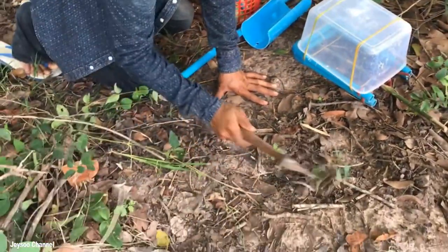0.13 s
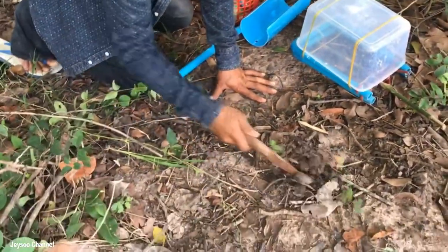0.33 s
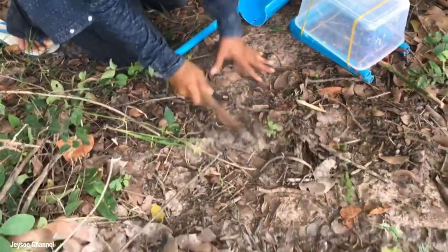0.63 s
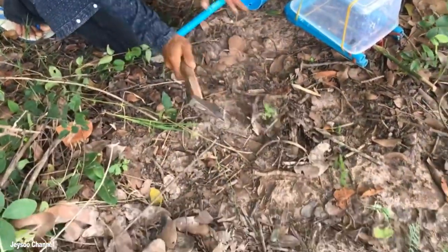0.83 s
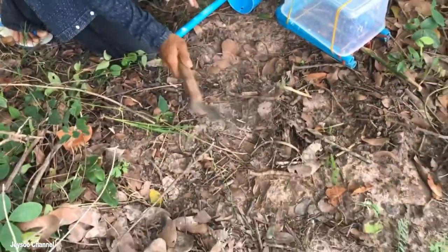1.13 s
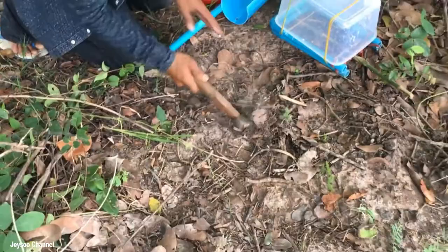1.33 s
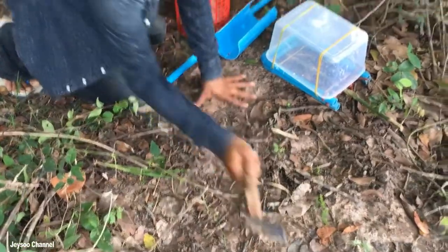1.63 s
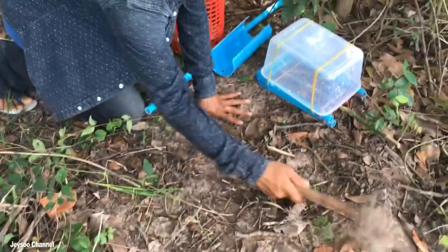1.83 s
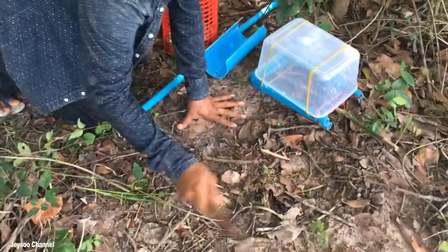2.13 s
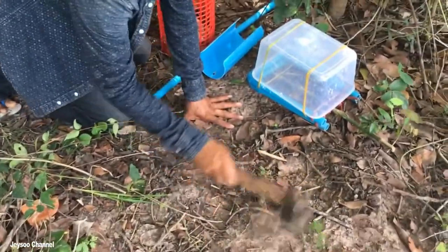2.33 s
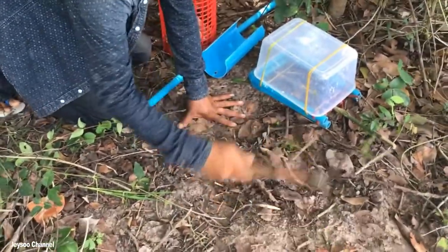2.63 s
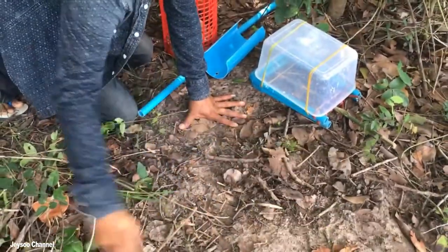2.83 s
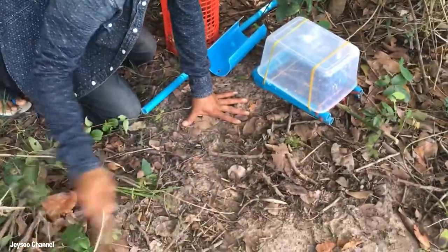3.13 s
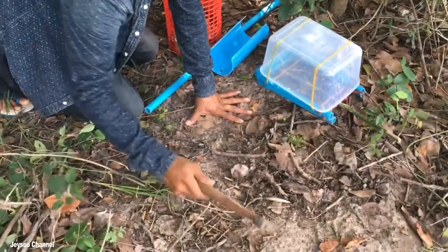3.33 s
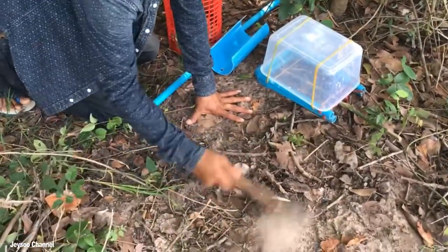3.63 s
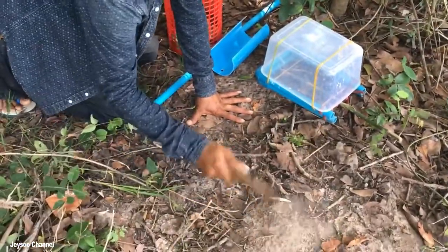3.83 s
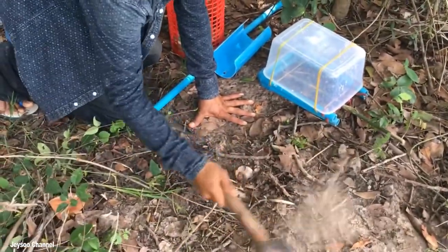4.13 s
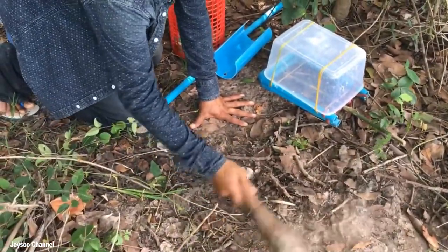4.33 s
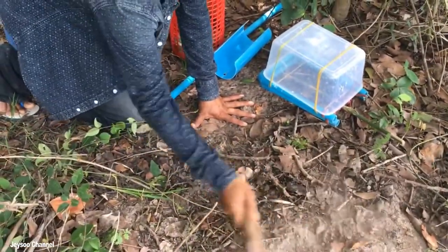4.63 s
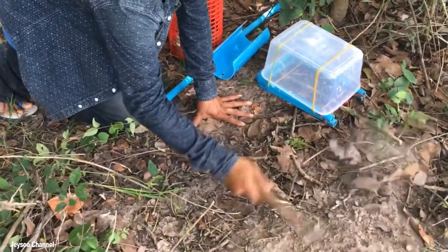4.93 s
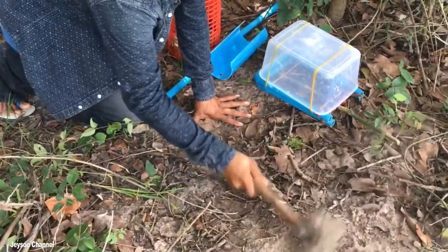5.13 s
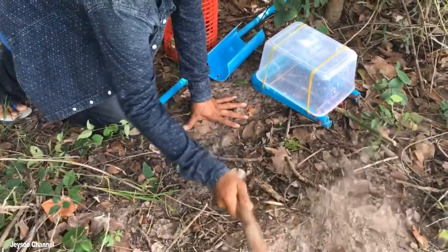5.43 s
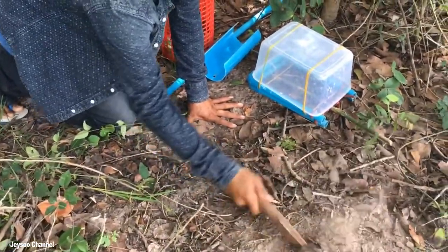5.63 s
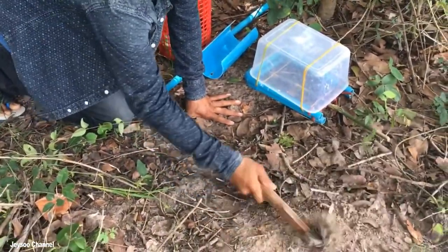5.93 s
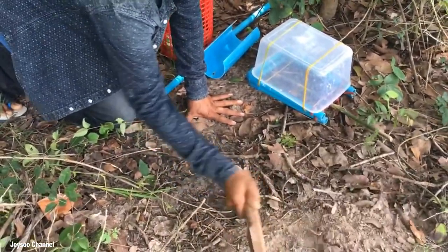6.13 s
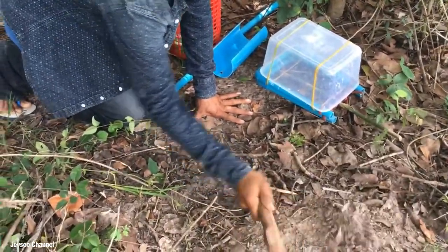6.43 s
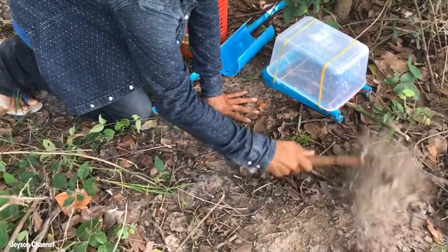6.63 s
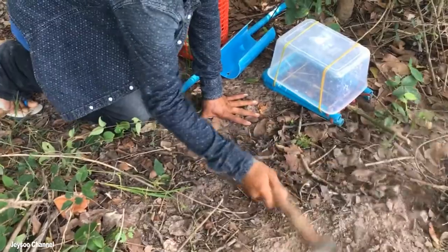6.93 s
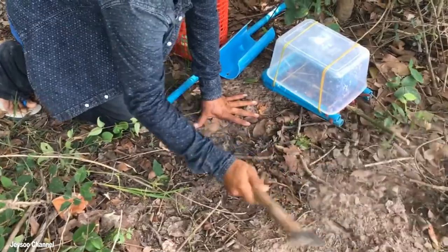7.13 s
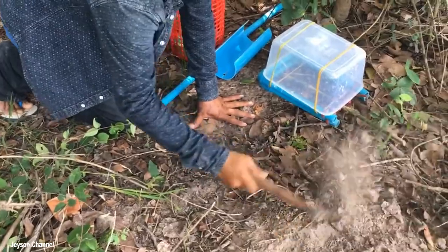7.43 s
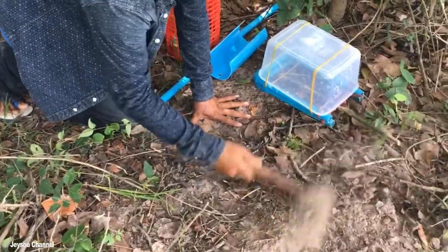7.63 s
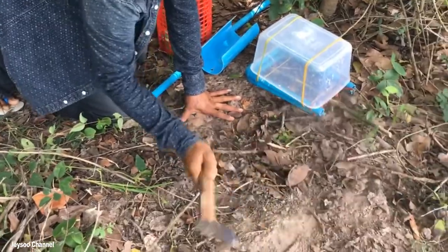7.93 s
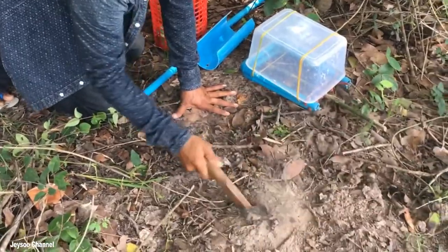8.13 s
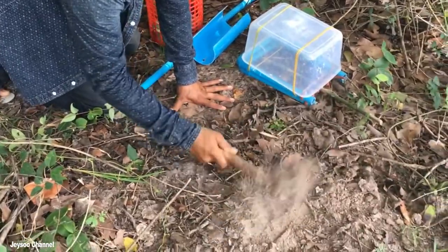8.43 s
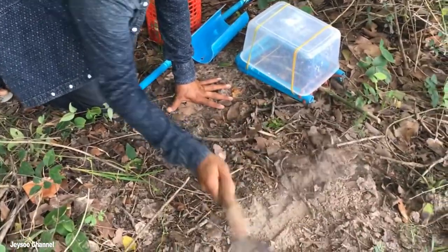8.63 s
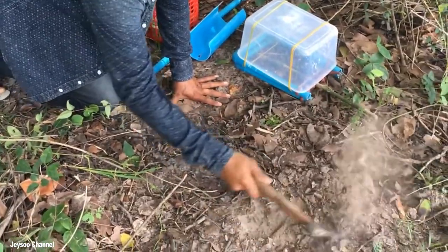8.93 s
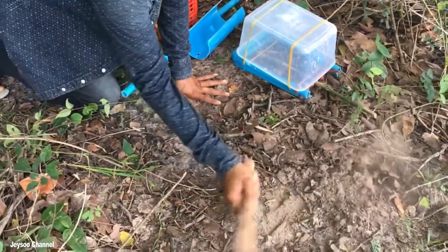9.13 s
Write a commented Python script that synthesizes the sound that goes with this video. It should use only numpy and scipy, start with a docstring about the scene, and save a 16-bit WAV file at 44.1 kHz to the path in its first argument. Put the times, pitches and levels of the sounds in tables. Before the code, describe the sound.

Short gritty hoe bites in dry earth, about three a second, with crunching leaf litter, pattering crumbs and dull ground thuds, heard very close.

```python
"""A small steel hoe with a wooden handle chops and rakes dry soil under leaf litter, outdoors, close to one microphone.
Each bite breaks crumbs, grates sand and rings the blade; the ground answers with thuds of damped noise.
Stirred leaves crackle as ringing fragments, snaps and dust hiss, with earth pattering down among them.
Clods knock as short hollow modes and tumble on; one squeak is faint.
Behind lie a low outdoor rumble and a faint far hiss, both of shaped noise."""
import sys
import numpy as np
from scipy import signal
from scipy.fft import rfft, irfft
from scipy.io import wavfile

SR = 44100
rng = np.random.default_rng(int(sys.argv[2]) if len(sys.argv) > 2 else 0)


def inscribe(sig):
    """Save sig as 16-bit PCM at rate SR to the path in sys.argv[1].

    A 1-D sig is mono; a 2-D sig holds one channel per row.
    Samples are clipped to [-1, 1] before scaling.
    """
    pcm = np.round(np.clip(np.atleast_2d(sig).T, -1, 1) * 32767)
    wavfile.write(sys.argv[1], SR, pcm.astype(np.int16))


N = 409248
TIME = np.arange(N) / SR  # seconds
CUTOFF_HZ = 15600  # top of the treble


def from_db(db):
    """Decibels to gain."""
    return 10 ** (np.asarray(db) / 20)


def rms_one(x):
    """Scale to unit power."""
    return x / np.sqrt(np.mean(x ** 2) + 1e-20)


def peak_one(x):
    """Scale to unit height."""
    return x / np.abs(x).max()


def curve(rows):
    """Join (seconds, value) rows by straight lines."""
    return np.interp(TIME, *np.transpose(rows))


def add(track, s, sound):
    """Mix a short sound into a track at time s in seconds."""
    start = max(0, int(s * SR))
    track[start:start + len(sound)] += sound[:max(0, N - start)]


def colour(x, spectrum, size=4096):
    """Causal (minimum-phase) filter with the given spectrum; white input keeps its power."""
    hz, db = np.transpose(spectrum)
    bins_hz = np.fft.rfftfreq(size, 1 / SR)
    log_gain = np.log(from_db(np.interp(np.log(bins_hz + 1), np.log(hz), db)))
    # keeping only the positive half of the cepstrum, doubled by the square, makes it causal
    cepstrum = irfft(log_gain)[:size // 2]
    response = irfft(np.exp(2 * rfft(cepstrum, size)))
    return signal.oaconvolve(x, response / np.linalg.norm(response))[:N]


def ring(x, hz, t60):
    """One mode: a unit click sets a sine of height 1 ringing, down 60 dB after t60 seconds."""
    radius = from_db(-60 / (t60 * SR))
    angle = 2 * np.pi * min(hz, SR / 2) / SR
    feedback = [1, -2 * radius * np.cos(angle), radius * radius]
    return signal.lfilter([0, np.sin(angle)], feedback, x + 1e-18)


def wander(per_s, size=16384):
    """A random zigzag with a spread of about 1 and per_s corners a second."""
    corners = np.clip(rng.standard_normal(size), -2, 2)
    return np.interp(TIME * per_s, np.arange(size), corners)


def flutter(per_s, depth_db):
    """A gain that wanders at random, with unit power."""
    return rms_one(from_db(depth_db * wander(per_s)))


def detune(x, per_s, share):
    """Shift the pitch by a new random share, per_s times a second."""
    return np.interp(TIME + share / per_s * wander(per_s), TIME, x)


def grains(per_s, spread_db):
    """Random fractures of uneven size; about unit power at any rate."""
    sizes = rms_one(from_db(spread_db * np.minimum(rng.exponential(1, N), 4)))
    chance = np.minimum(per_s / SR, 1)
    struck = rng.random(N) < chance
    return sizes * rng.choice([-1, 1], N) * struck / np.sqrt(chance)


def burst(s, length_s, db, rise_db_per_s, fall_db_per_s):
    """Power of a movement that swells up to time s, holds and dies away."""
    before_s = np.maximum(s - TIME, 0)
    after_s = np.maximum(TIME - s - length_s, 0)
    below_db = before_s * rise_db_per_s + after_s * fall_db_per_s
    power, near = np.zeros(N), below_db < 60
    power[near] = from_db(db - below_db[near]) ** 2
    return power


# The blade bites into the soil. Each row: start in seconds, length in seconds, then relative levels in dB
# of crumbling earth, grit, blade ring and thud of the ground.
HOE_BITES = [(0.134, 0.014, -34.5, -28.5, -56, -69), (0.412, 0.012, -39.5, -36.5, -56, -65),
             (0.769, 0.014, -36, -38.5, -62, -43), (1.071, 0.011, -51, -34.5, -43, -40.5),
             (1.396, 0.0022, -34, -38, -52, -61), (1.917, 0.01, -33, -33, -38.5, -54),
             (2.11, 0.0034, -41.5, -36, -54, -48), (2.449, 0.003, -41, -38, -35.5, -59),
             (2.487, 0.035, -40.5, -30, -42.5, -58), (2.55, 0.012, -42, -38, -40, -41),
             (2.834, 0.028, -46.5, -40.5, -42.5, -37), (3.106, 0.021, -34.5, -29.5, -57, -48),
             (3.725, 0.026, -38, -35.5, -45.5, -60), (3.763, 0.0054, -52, -47, -44, -73),
             (4.138, 0.017, -31.5, -36.5, -40, -36.5), (4.44, 0.03, -40.5, -39, -46, -62),
             (4.49, 0.016, -39.5, -38.5, -41, -69), (4.509, 0.053, -51, -44.5, -51, -66),
             (4.799, 0.0057, -42, -33.5, -45, -74), (4.904, 0.0098, -41.5, -29, -43, -55),
             (5.23, 0.007, -44, -34, -48, -49), (5.252, 0.019, -41, -56, -43.5, -55),
             (5.309, 0.01, -46, -42, -43, -67), (5.612, 0.011, -35, -33.5, -41.5, -38.5),
             (5.963, 0.023, -39.5, -43, -51, -32), (6.273, 0.018, -38.5, -37, -47, -34),
             (6.588, 0.0313, -34, -37, -41, -37.5), (7.032, 0.007, -34, -37, -43, -52),
             (7.342, 0.014, -33.5, -39.5, -40, -53), (7.372, 0.011, -38.5, -37.5, -55, -61),
             (7.685, 0.036, -38, -42, -43.5, -54), (8.123, 0.011, -34, -36, -41, -47),
             (8.446, 0.013, -35, -38.5, -41, -49), (8.476, 0.024, -39, -41.5, -51, -40.5),
             (8.857, 0.014, -35.5, -32.5, -41.5, -48), (8.87, 0.039, -41, -34.5, -40, -40),
             (9.242, 0.041, -42, -37.5, -53, -61)]


def contact(part, rise_s, fall_s, ease_db):
    """Force of all bites: it jumps as the blade enters, eases as the soil slows it, and dies as the soil settles."""
    power = np.zeros(N)
    t = np.arange(SR // 4) / SR - 1 / 20  # seconds from the start of the bite
    column = ["s", "length", "earth", "grit", "ring"].index(part)
    for row in HOE_BITES:
        start, length = row[:2]
        outside = np.maximum(-t, 0) / rise_s + np.maximum(t - length, 0) / fall_s
        progress = np.clip(t / length, 0, 1)
        force = from_db(row[column] + ease_db * (.5 - progress)) * np.exp(-outside)
        add(power, start + t[0], force ** 2)
    return np.sqrt(power)


# Steel blade on its handle. Each row: mode in Hz (before detuning), relative level in dB, t60 in seconds.
BLADE_MODES = [(800, -9.5, 0.012), (1630, -3, 0.042), (2200, -22, 0.036), (5950, 3, 0.011),
               (5970, -1.5, 0.08), (13300, -14, 0.015)]
# Spectrum of crumbling earth. Each row: frequency in Hz, relative level in dB per Hz.
EARTH_SPECTRUM = [(120, -24), (300, -5.5), (520, -6.5), (800, 2.5), (1100, -1.5), (1550, 2), (2200, -1),
                  (3000, -14), (6000, -56)]
# Spectrum of grating sand. Each row: frequency in Hz, relative level in dB per Hz.
GRIT_SPECTRUM = [(900, -13), (2000, -1.5), (3000, 2.5), (4200, 2.5), (5000, -1), (6400, 1.5), (8000, -1),
                 (9700, -1), (10600, -6.5), (12000, -3.5), (15500, -7.5)]


def hoe(earth_db, grit_db, blade_db):
    """The blade sticks and slips: crumbs break, sand grates and the steel rings, detuned by the earth on it."""
    slips = flutter(per_s=670, depth_db=3)
    crumb_force = contact("earth", rise_s=0.00065, fall_s=0.0039, ease_db=5.5)
    crumbs = grains(per_s=4500, spread_db=2.5) * slips * crumb_force
    sand_force = contact("grit", rise_s=0.0025, fall_s=0.0059, ease_db=4.0)
    sand = grains(per_s=12000, spread_db=1.5) * slips * sand_force
    scratch_force = contact("ring", rise_s=0.00079, fall_s=0.01, ease_db=8.0)
    scratch = grains(per_s=10000, spread_db=-0.5) * scratch_force
    steel = np.zeros(N)
    for hz, db, t60 in BLADE_MODES:
        # each mode is scaled by the energy of its own ring
        energy_scale = np.sqrt(4 * np.log(1000) / (t60 * SR))
        steel += from_db(db) * ring(scratch, hz, t60) * energy_scale
    steel = detune(steel, per_s=8, share=0.0042)
    soil = from_db(earth_db) * colour(crumbs, EARTH_SPECTRUM) + from_db(grit_db) * colour(sand, GRIT_SPECTRUM)
    return soil + from_db(blade_db) * steel


# Spectrum of the struck ground. Each row: frequency in Hz, relative level in dB per Hz.
GROUND_SPECTRUM = [(40, -12), (110, -2.5), (200, 2.5), (350, 3), (560, -12.5), (1200, -14), (4000, -72)]
THUD_AT_SHARE = .55  # how far into a bite the ground takes the blow


def thuds(level_db, fall_s, size=4096):
    """Packed ground takes the blow with a dull, quickly damped shudder."""
    force, t = np.zeros(N), np.arange(size) / SR
    for s, length, *_, db in HOE_BITES:
        add(force, s + THUD_AT_SHARE * length, from_db(db + level_db) * np.exp(-t / fall_s))
    return colour(force * rng.standard_normal(N), GROUND_SPECTRUM)


# The hoe is dragged through the leaves, gathering speed.
# Each row: fastest moment in seconds, swell in dB per second, stirring level in dB.
LEAF_SWEEPS = [(0.409, 119, -45.5), (1.07, 117, -58), (1.793, 70, -50), (2.135, 500, -37),
               (2.512, 127, -30), (2.906, 205, -31.5), (3, 257, -28), (3.042, 193, -31),
               (3.085, 202, -28.5), (3.12, 146, -28), (4.44, 83, -53.5), (4.54, 224, -42.5),
               (4.843, 255, -31), (6.688, 276, -30.5), (7.78, 119, -34)]
# Thrown and pushed earth patters over the leaves. Each row: start in seconds, length in seconds, stirring level in dB.
EARTH_SHOWERS = [(0.205, 0.027, -48), (0.498, 0.0093, -48), (0.703, 0.078, -53), (1.0, 0.042, -53),
                 (1.646, 0.065, -55), (2.18, 0.087, -46), (2.572, 0.08, -42.5), (3.164, 0.16, -41),
                 (3.393, 0.039, -56), (3.956, 0.25, -57.5), (4.667, 0.079, -50.5), (4.93, 0.048, -41),
                 (5.066, 0.21, -46.5), (5.479, 0.073, -46), (5.991, 0.048, -52.5), (6.766, 0.052, -40),
                 (6.9, 0.06, -38), (7.32, 0.29, -49.5), (7.891, 0.2, -44.5), (8.513, 0.11, -49.5),
                 (8.72, 0.11, -49), (9.12, 0.3, -50.5)]
# Leaves settle between strokes. Each row: time in seconds, stirring level in dB.
LEAF_SETTLING = [(0, -61), (.8, -57.5), (1.5, -58.5), (1.88, -62), (2.05, -54), (3.68, -64), (4.3, -62.5),
                 (5.85, -60.5), (6.5, -61.5), (7.2, -54.5), (8.38, -70), (9, -52)]
SHAKE_DB = -15  # leaves shaken by each bite, relative to its grit
SHAKE_RISE_DB_PER_S, SHAKE_FALL_DB_PER_S = 1500, 167
SWEEP_FALL_DB_PER_S = 212
SHOWER_RISE_DB_PER_S, SHOWER_FALL_DB_PER_S = 224, 97.5


def stirring():
    """Level of the leaves in dB: bites shake them, sweeps drag them, earth rains on them, and they settle."""
    shaken = sum(burst(s + length, 0, grit + SHAKE_DB, SHAKE_RISE_DB_PER_S, SHAKE_FALL_DB_PER_S)
                 for s, length, _, grit, _, _ in HOE_BITES)
    dragged = sum(burst(s, 0, db, swell, SWEEP_FALL_DB_PER_S) for s, swell, db in LEAF_SWEEPS)
    showered = sum(burst(s, length, db, SHOWER_RISE_DB_PER_S, SHOWER_FALL_DB_PER_S)
                   for s, length, db in EARTH_SHOWERS)
    settling = from_db(curve(LEAF_SETTLING)) ** 2
    return 10 * np.log10(shaken + dragged + showered + settling)


# Spectrum of dry leaves. Each row: frequency in Hz, relative level in dB per Hz.
LEAF_SPECTRUM = [(200, -10.5), (650, -7.5), (1000, -5), (1800, -1.5), (3000, -1), (4300, 1.5), (5000, -1.5),
                 (6100, 3), (7400, -0.5), (9600, 0), (10500, -7), (11700, -2.5), (15500, -9.5)]
# Loose earth moving with the leaves. Each row: time in seconds, relative level in dB following the leaves.
LOOSE_EARTH_LEVEL = [(0, -0.5), (.5, -2.5), (1.8, -5.5), (2.1, -6), (3.1, -13), (4.4, -22), (6.9, -11),
                     (7.6, -20.5), (8.5, -4.5), (9.28, -30)]
EVEN_RUSH_DB = -31  # around this stirring level and above, the leaves merge into an even rush


def litter(stir_db, leaves_db, crackle_db, dust_db, earth_db, cycles, count=18):
    """Harder stirring breaks more leaf fragments a second; each rings at its own pitch over a hiss of dust."""
    per_s = 65 * from_db(.65 * (stir_db + 49.5))
    uneven = 1 / (1 + from_db(stir_db - EVEN_RUSH_DB))
    fragments = np.zeros(N)
    for hz in np.geomspace(900, 14000, count):
        rings = ring(grains(per_s, spread_db=4.0), hz, cycles / hz)
        rings = detune(rings, per_s=30, share=.05)
        # high fragments cover a wider band, so they carry more of the power; each size comes in flurries
        flurries = flutter(per_s=50, depth_db=4.8 * uneven)
        fragments += np.sqrt(hz) * rms_one(rings) * flurries
    crackle = grains(3.5 * per_s, spread_db=3.5)
    dust = rng.standard_normal(N) * flutter(per_s=270, depth_db=-0.6)
    mix = from_db(leaves_db) * rms_one(fragments) + from_db(crackle_db) * crackle + from_db(dust_db) * dust
    stir = from_db(stir_db) * flutter(per_s=100, depth_db=2.35 * uneven)
    # loose earth falls in clumps
    clumps = flutter(per_s=130, depth_db=3.0) * from_db(curve(LOOSE_EARTH_LEVEL) + earth_db)
    crumbs = grains(30 * per_s, spread_db=4.5) * clumps
    return colour(stir * mix, LEAF_SPECTRUM) + colour(stir * crumbs, EARTH_SPECTRUM)


# The loudest stalks and dry leaves snapping. Each row: start in seconds, relative level in dB, centre in Hz.
LOUD_SNAPS = [(.4904, -36, 5270), (.6952, -38, 6100), (.7286, -38, 2300), (.757, -22.5, 9300),
              (.7953, -34, 2770), (.8166, -40, 2800), (.978, -39, 2600), (1.007, -40, 2200),
              (1.175, -38.5, 5100), (1.221, -42, 5700), (1.3975, -32, 3800), (1.5967, -41, 7350),
              (2.1074, -28, 7200), (2.192, -33, 5400), (2.31, -36, 3400), (2.3413, -34, 5570),
              (2.3694, -46, 5330), (2.376, -31, 2950), (2.3913, -28, 3400), (2.4195, -26.5, 6500),
              (2.5105, -18, 4480), (2.5294, -22, 4870), (2.5543, -27, 5400), (2.6444, -30, 3900),
              (2.6932, -30.5, 4170), (2.739, -30.5, 5400), (2.81, -32, 4530), (2.857, -29, 1800),
              (2.874, -20, 6700), (2.9353, -23.5, 5400), (2.9905, -18.5, 5840), (3.0067, -17.5, 4400),
              (3.415, -41, 6100), (3.4537, -35.5, 4340), (3.627, -41.5, 5500), (3.8772, -39, 5200),
              (3.9903, -37.5, 7140), (4.1068, -38.5, 5100), (4.191, -37, 7200), (4.5567, -29.5, 6160),
              (4.7996, -28, 5460), (4.911, -24.5, 6200), (5.106, -46, 5800), (5.26, -26, 4600),
              (5.46, -35, 6300), (5.978, -26.5, 1300), (6.1824, -39, 3420), (6.4379, -47, 4500),
              (6.5785, -32.5, 5200), (6.5963, -20, 4900), (6.666, -24.5, 4170), (6.9003, -41, 4700),
              (7.1502, -42, 3500), (7.3447, -38, 2600), (7.6844, -25, 1550), (7.7615, -28, 4500),
              (7.8645, -34.5, 1900), (7.9569, -43, 3500), (8.046, -39, 4000), (8.1802, -35.5, 5950),
              (8.7127, -34.5, 4000)]
SMALL_SNAPS_PER_S = 10
SMALL_SNAP_DB, SMALL_SNAP_SPREAD_DB = -47, 5.5  # relative, at the usual stir of the leaves
SMALL_SNAP_FOLLOWS = 0.57  # share of the swing of the leaves' level
SMALL_SNAP_HZ, SMALL_SNAP_OCTAVES = 5200, 1  # centre and spread of their pitch


def breakages(stir_db):
    """All snaps as (s, dB, Hz): the loud ones, and small ones at random, stronger as the leaves are stirred."""
    at = rng.integers(0, N, int(SMALL_SNAPS_PER_S * N / SR))
    strength, pitch = np.clip(rng.standard_normal((len(at), 2)), -2, 1).T
    swing_db = stir_db[at] - np.median(stir_db)
    db = SMALL_SNAP_DB + SMALL_SNAP_FOLLOWS * swing_db + SMALL_SNAP_SPREAD_DB * strength
    hz = SMALL_SNAP_HZ * 2 ** (SMALL_SNAP_OCTAVES * pitch)
    return LOUD_SNAPS + list(zip(at / SR, db, hz))


def snaps(rows, level_db, crack_s, tail_db, tail_s, octaves, size=1024):
    """A sharp crack and a short shiver of tearing fibres, coloured by the size of the piece that breaks."""
    out, t = np.zeros(N), np.arange(size) / SR
    shape = np.exp(-t / crack_s) + from_db(tail_db) * np.exp(-t / tail_s)
    for (s, db, hz), noise in zip(rows, rng.standard_normal((len(rows), size))):
        edges = [min(hz, SR / 4) / 2 ** octaves, min(hz * 2 ** octaves, CUTOFF_HZ)]
        band = signal.butter(1, edges, "band", fs=SR, output="sos")
        crack = signal.sosfilt(band, noise * shape)
        rms_2ms = np.sqrt(np.sum(crack ** 2) / (.002 * SR))  # all its energy, as if spread over 2 ms
        add(out, s, from_db(db + level_db) * crack / rms_2ms)
    return out


# Clods and sticks knocking. Each row: start in seconds, relative peak in dB, lowest pitch in Hz, its t60 in seconds.
CLOD_KNOCKS = [(0.7287, -26.5, 1740, 0.022), (0.979, -27, 1160, 0.015), (1.075, -25, 1080, 0.031),
               (1.397, -28, 745, 0.013), (2.453, -24, 1660, 0.016), (2.556, -29, 596, 0.026),
               (2.743, -34, 406, 0.12), (5.617, -22.5, 775, 0.01), (6.777, -32, 1000, 0.016),
               (6.799, -31, 546, 0.04), (6.803, -31.5, 406, 0.11), (7.845, -28, 458, 0.041),
               (7.891, -30, 600, 0.018), (7.984, -23, 705, 0.02), (7.987, -21.5, 232, 0.084)]


def knocks(level_db, overtone, overtone_db, crumble_db, crumble_s, crunch_db, size=8192, count=4):
    """A clod or stick lands with a crunch of earth and a few hollow modes, each weaker and shorter than the last."""
    out, crunch, t = np.zeros(N), np.zeros(N), np.arange(size) / SR
    for (s, db, hz, t60), noise in zip(CLOD_KNOCKS, rng.standard_normal((len(CLOD_KNOCKS), size))):
        crumbs = noise * np.exp(-t / crumble_s)
        click = t == 0
        jolt = np.diff(click + from_db(crumble_db) * crumbs, prepend=0)  # a small body radiates little bass
        note = np.zeros(size)
        for k in range(count):
            mode = peak_one(ring(jolt, hz * overtone ** k, t60 / (1 + k)))
            note += (-1) ** k * from_db(k * overtone_db) * mode
        add(out, s, from_db(db + level_db) * peak_one(note))
        add(crunch, s, from_db(db + crunch_db) * crumbs)
    return out + colour(crunch, EARTH_SPECTRUM)


# Landed clods tumble on. Each row: start in seconds, length in seconds, level in dB.
CLOD_TUMBLES = [(2.397, 0.23, -53.5), (6.788, 0.056, -52), (7.863, .05, -48.5), (8.024, 0.039, -51.5)]
# Spectrum of hollow-sounding ground under them. Each row: frequency in Hz, relative level in dB per Hz.
TUMBLE_SPECTRUM = [(120, -26), (230, 4), (340, -1), (600, -9.5), (1200, -23)]
TUMBLE_RISE_DB_PER_S, TUMBLE_FALL_DB_PER_S = 900, 150


def tumbles(bumps_per_s):
    """Rolling clods give a low, uneven patter of bumps that trails off."""
    power = sum(burst(s, length, db, TUMBLE_RISE_DB_PER_S, TUMBLE_FALL_DB_PER_S)
                for s, length, db in CLOD_TUMBLES)
    return colour(np.sqrt(power) * grains(bumps_per_s, spread_db=-1.5), TUMBLE_SPECTRUM)


SQUEAK_S, SQUEAK_HZ = .311, 905  # start, after the first bite, and pitch


def squeak(level_db, octave_db, fall_s):
    """A faint, unsteady squeak with its octave starts suddenly and fades."""
    age = np.maximum(TIME - SQUEAK_S, 0)
    phase = 2 * np.pi * SQUEAK_HZ * age
    tone = (np.sin(phase) + from_db(octave_db) * np.sin(2 * phase)) * np.exp(-age / fall_s)
    return from_db(level_db) * tone * flutter(per_s=310, depth_db=3)


# Spectrum of the low outdoor rumble. Each row: frequency in Hz, relative level in dB per Hz.
RUMBLE_SPECTRUM = [(20, -29), (33, -16), (48, -0.5), (70, 3), (110, -1.5), (150, -9), (195, -5.5),
                   (230, -10), (285, 1), (335, -12.5), (395, 0), (480, -23), (1000, -28.5), (4000, -35),
                   (15000, -33)]


def rumble(level_db):
    """Steady noise, mostly low, behind the digging."""
    return from_db(level_db) * colour(rng.standard_normal(N), RUMBLE_SPECTRUM)


# Spectrum of the faint far hiss. Each row: frequency in Hz, relative level in dB per Hz.
HISS_SPECTRUM = [(4900, -24), (5450, 17), (5700, 15), (6030, 0), (6300, -24)]


def far_hiss(level_db):
    """Steady noise in a narrow treble band."""
    return from_db(level_db) * colour(rng.standard_normal(N), HISS_SPECTRUM)


def scene():
    """Digging close to one microphone in open air, over a low rumble and a faint far hiss."""
    digging = hoe(earth_db=-2.0, grit_db=-1.5, blade_db=-4.5) + thuds(level_db=0.0, fall_s=0.011)
    stir_db = stirring()
    leaves = litter(stir_db, leaves_db=-8.0, crackle_db=-6.5, dust_db=-4.5, earth_db=-7.0, cycles=16.4)
    twigs = snaps(breakages(stir_db), level_db=-3.0, crack_s=.0004, tail_db=-3.5, tail_s=0.0051, octaves=0.59)
    clods = knocks(level_db=-5.5, overtone=1.75, overtone_db=-8.0,
                   crumble_db=-22.0, crumble_s=0.0066, crunch_db=-19.5)
    clods += tumbles(bumps_per_s=400)
    faint_squeak = squeak(level_db=-50, octave_db=-5, fall_s=.03)
    background = rumble(level_db=-57.5) + far_hiss(level_db=-70.0)
    return (digging + leaves + twigs + clods + faint_squeak + background)[None]


def record(dry):
    """The top of the treble is cut steeply."""
    treble_cut = signal.ellip(12, .1, 80, CUTOFF_HZ, fs=SR, output="sos")
    return signal.sosfilt(treble_cut, dry)


dry = scene()
out = record(dry)
inscribe(out)
```